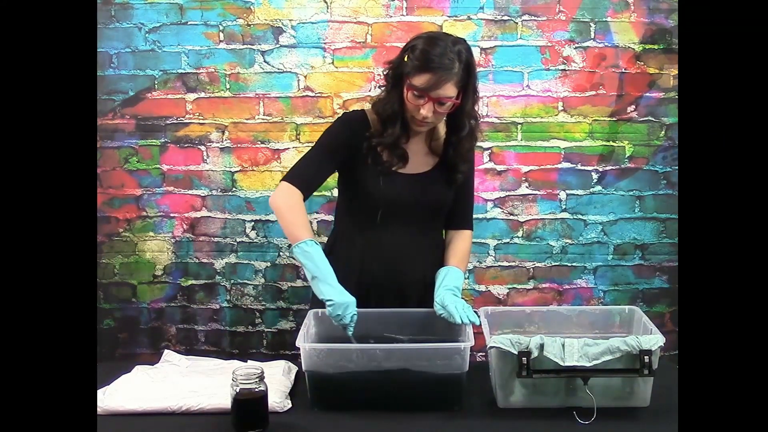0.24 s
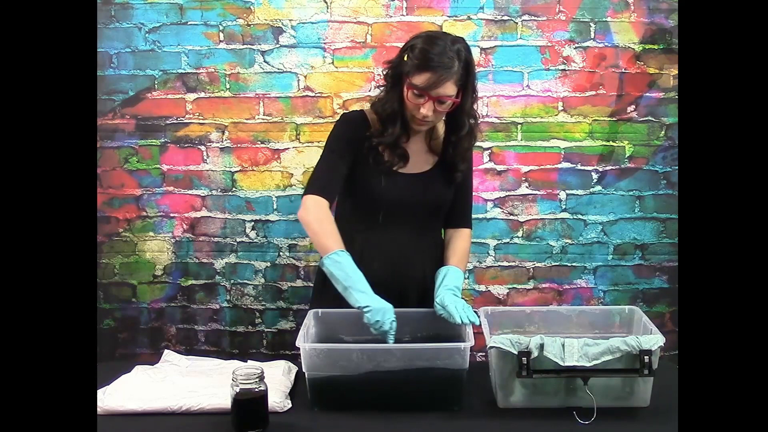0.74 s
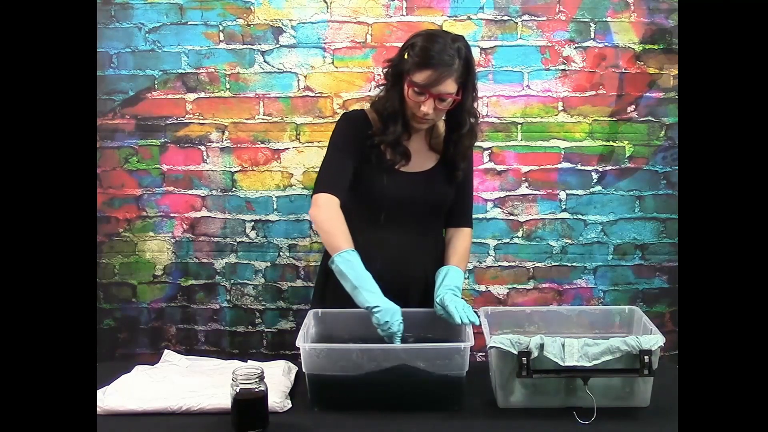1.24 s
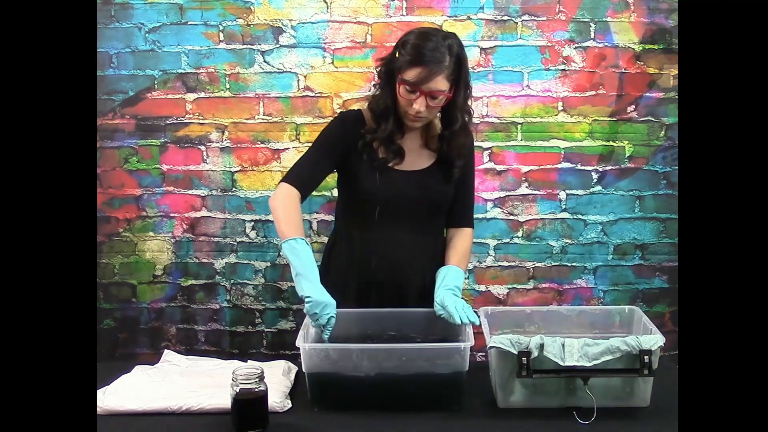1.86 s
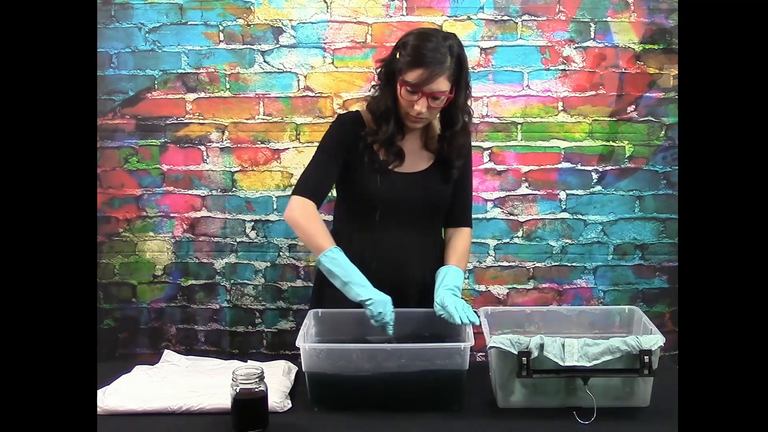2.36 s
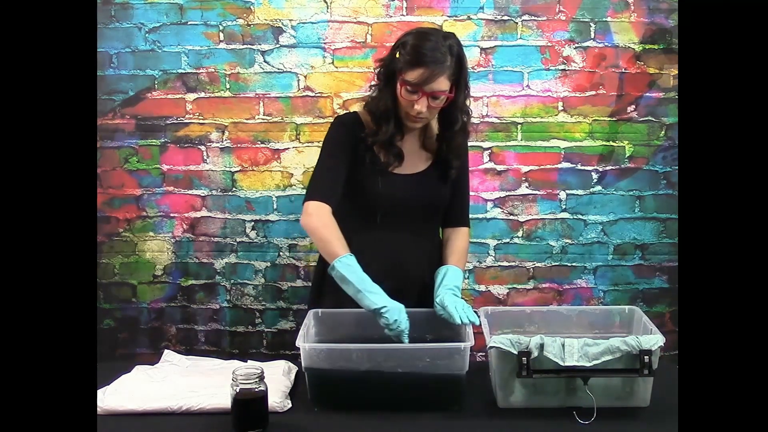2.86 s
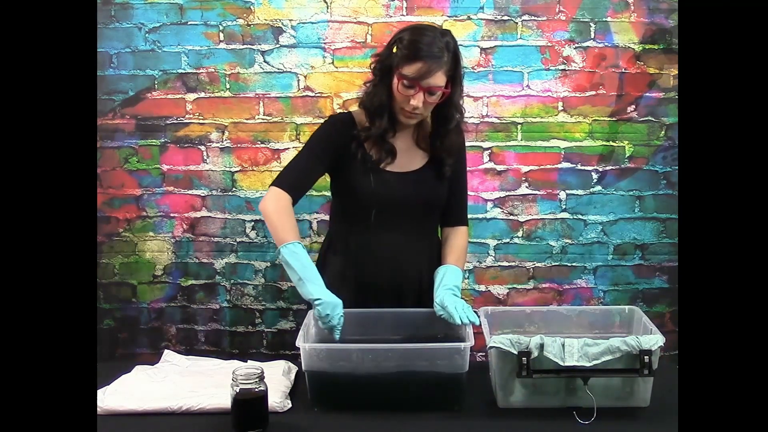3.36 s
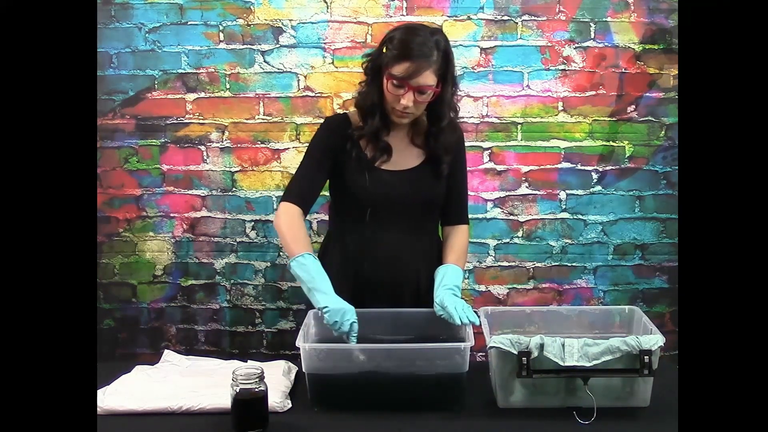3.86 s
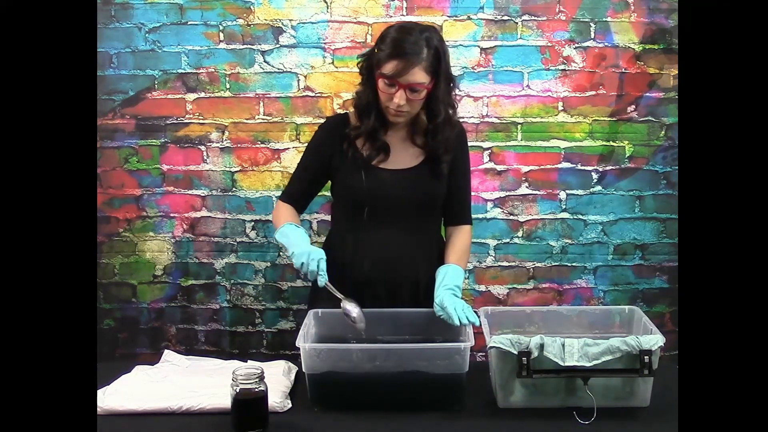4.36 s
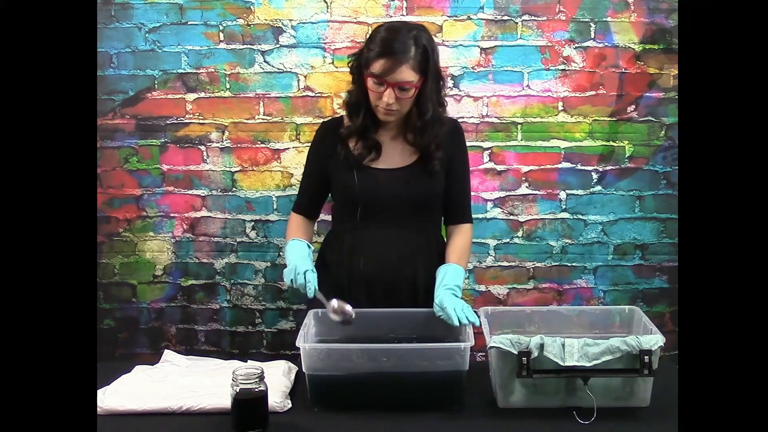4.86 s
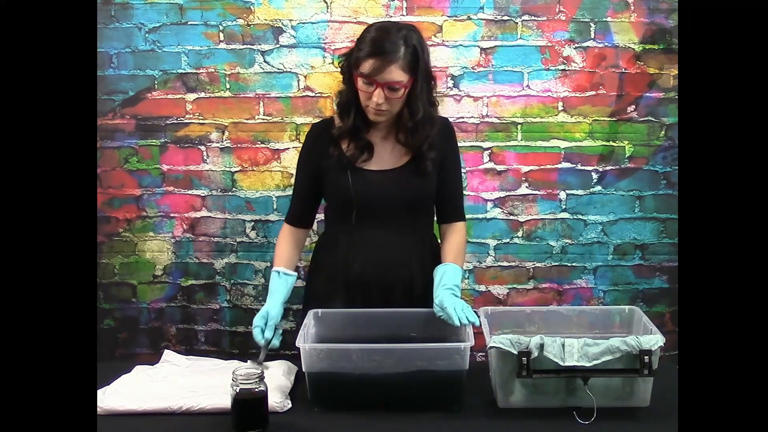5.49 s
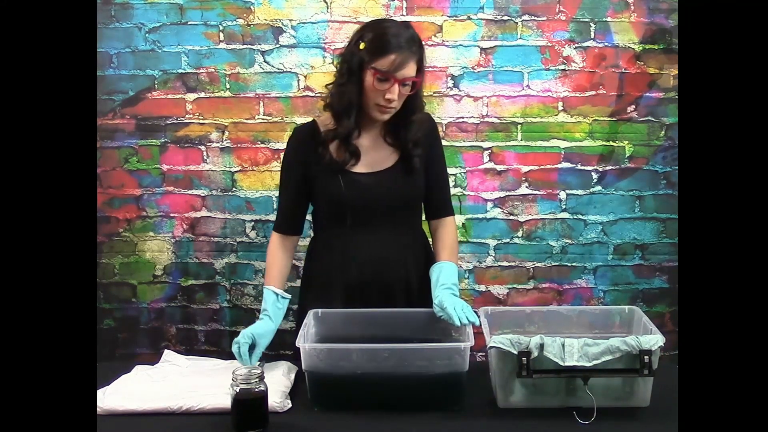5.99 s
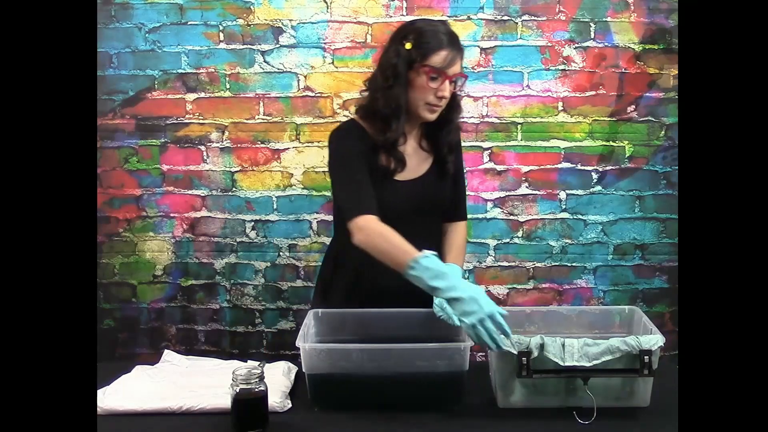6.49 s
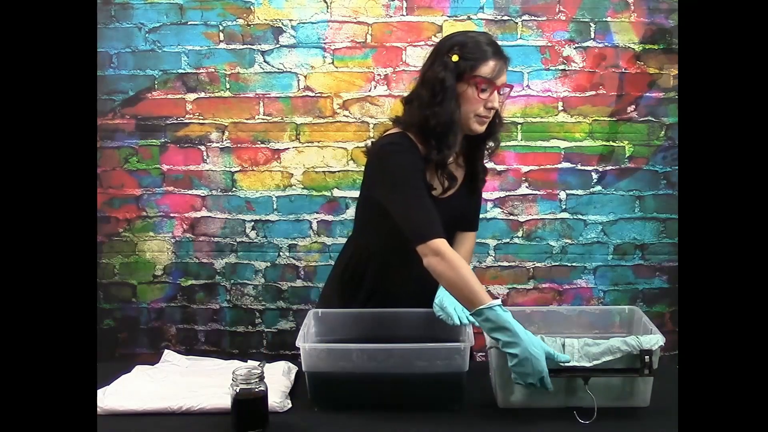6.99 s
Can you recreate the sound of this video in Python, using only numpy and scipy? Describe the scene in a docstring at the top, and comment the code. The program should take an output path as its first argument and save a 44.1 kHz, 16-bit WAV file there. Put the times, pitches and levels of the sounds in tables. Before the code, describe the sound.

Close up in a small, fairly dry room with soft hiss and faint hum, water gurgles and plinks as a spoon sweeps round a plastic tub for about four seconds. After a drip and a sharp click, the spoon knocks lightly in a glass jar. Rubbery, grainy glove and cloth movement follows, with a hollow bump on another tub and small closing clicks.

```python
"""Stirring a dye bath

A gloved hand stirs a plastic tub with a metal spoon: air bubbles ring as decaying tones, droplets snap as short
noise, an eddy gulps with a rising tone, and every stroke swishes and sprays. The spoon is lifted, drips, clicks and
is stood in a glass jar, a few short decaying tones. Sleeve and rubber gloves rustle as grainy noise, and a second
tub is bumped and booms. One close microphone hears it in a small, fairly dry room with steady hiss and faint hum."""
import sys
import numpy as np
from scipy import signal
from scipy.fft import rfft, irfft
from scipy.io import wavfile
from scipy.ndimage import uniform_filter1d

SR = 44100
rng = np.random.default_rng(int(sys.argv[2]) if len(sys.argv) > 2 else 0)


def to_wav(s):
    """Save 16-bit WAV."""
    ch = np.atleast_2d(s).T  # columns
    pcm = np.round(np.clip(ch, -1, 1) * 32767)  # PCM
    wavfile.write(sys.argv[1], SR, pcm.astype(np.int16))


N = 318843
T = np.arange(N) / SR  # time of every sample, in seconds
TOP_HZ = 15800  # highest pitch kept

# Steady background hiss, as a curve. Columns: frequency_hz, relative_level_db
AIR_COLOUR = [(12, -42), (20, -1), (77, -2), (120, -2.5), (168, -3), (262, -1.5), (897, -5), (1330, 2.5),
              (4180, -3), (5850, -2), (7730, -4.5), (8650, -1), (13200, -7), (16000, -12.5)]
# Hiss that differs between the two channels. Columns: frequency_hz, relative_level_db
SIDE_COLOUR = [(12, -27), (20, 0), (49, 1), (485, -5), (1120, -1.5), (4540, 0), (7730, -3.5), (9950, -6.5),
               (14300, -4.5), (16000, -2)]

# Sharp clicks of spoon and glove. Columns: start_s, level_db (before a trim), decay_s (to 1/e)
CLICKS = [(4.3666, -25, 0.00053), (4.802, -31.5, 0.00045), (5.117, -15.5, 0.0017), (5.123, -38.5, 0.027),
          (5.724, -25.5, .003), (5.873, -30.5, .0061), (5.881, -33, 0.017), (6.717, -20, 0.00078),
          (6.965, -34, .0017), (7.0583, -29, 0.00047), (7.072, -30, .0024), (7.166, -35.5, 0.0026)]
# Tone colour of those clicks. Columns: frequency_hz, relative_level_db
CLICK_COLOUR = [(180, -62), (300, -26), (749, -25), (1480, 0), (2210, -6), (3080, -4.5), (3700, -8.5),
                (3950, -6.5), (4750, -5), (7690, -8.5), (10200, -5), (12900, -13), (16000, -39)]
# Dull knocks of the spoon and the jar. Columns: start_s, level_db (before the bass is cut)
KNOCKS = [(5.327, -34), (5.8119, -13.5), (5.818, -40), (5.871, -24.5), (5.8893, -24.5), (5.915, -29)]
# Tones of the struck jar. Columns: pitch_hz, ring_s (time to fall 60 dB), relative_level_db
JAR = [(1115, 0.0079, 0.5), (1780, 0.0073, -1.5), (2230, 0.0092, -0.5), (2880, 0.0026, 4.5)]
# Bumps on the tubs. Columns: start_s, peak_db, contact_s
BUMPS = [(3.279, -44.5, 0.0032), (3.625, -43.5, 0.0029), (3.65, -49, .0027), (6.673, -26, .0004),
         (6.69, -30.5, 0.00068)]
# Tones of the struck tubs. Columns: pitch_hz, ring_s (time to fall 60 dB), relative_level_db
TUB = [(124.2, 0.3, -16), (223, 0.21, -17.5), (272.3, 0.34, -19.5), (323, 0.25, -13.5), (498, 0.074, -1.5),
       (557, 0.053, 2), (628, 0.11, 2), (698, 0.056, -0.5), (843, 0.067, -3)]

# A glove scuffs the tub's rim. Columns: start_s, level_db
SCUFFS = [(6.58, -50.5), (7.089, -46), (7.128, -44.5)]
# Tone colour of the scuffs. Columns: frequency_hz, relative_level_db
SCUFF_COLOUR = [(500, -27), (950, 2.5), (2100, -1), (4500, -21)]
# Movements of the arm, before the trims in rustle(). Columns: start_s, length_s, glove_hiss_db, sleeve_rustle_db
MOVES = [(4.05, 0.31, -54.5, -57.5), (4.41, 0.067, -52.5, -52.5), (4.61, 0.021, -60, -52.5),
         (4.79, 0.029, -56, -59.5), (5.21, 0.15, -61, -73), (5.46, 0.025, -57, -53),
         (5.56, 0.028, -49, -46.5), (5.68, 0.13, -49, -45.5), (5.79, 0.12, -46, -44),
         (5.96, .22, -52.5, -48.5), (6.16, 0.12, -47, -47), (6.27, 0.17, -45.5, -46),
         (6.47, .21, -48, -52.5), (6.7, 0.29, -50.5, -57), (7.04, 0.086, -49.5, -58),
         (7.17, 0.055, -47.5, -49.5)]
MOVE_ATTACK_S, MOVE_RELEASE_S = 0.029, 0.085  # rise time; time to die away to 1/e
# Tone colour of the rubber gloves. Columns: frequency_hz, relative_level_db
GLOVE_COLOUR = [(3000, -8), (5300, -34), (6500, 1.5), (8600, 6.5), (9800, 5.5), (11000, 1.5), (12600, 3.5),
                (14500, -5.5), (16000, -25)]
# Tone colour of the cloth sleeve. Columns: frequency_hz, relative_level_db
SLEEVE_COLOUR = [(150, -21), (500, -20.5), (750, -10.5), (1100, -0.5), (1400, 1), (2300, -2), (3100, 0.5),
                 (3800, -4), (5000, -4.5), (5900, -1), (7300, -10.5), (8600, -9.5), (10000, -15),
                 (16000, -30)]
# Tone colour of the fluttering air. Columns: frequency_hz, relative_level_db
DRAUGHT_COLOUR = [(25, 3), (200, -5.5), (600, -8.5), (3000, -70)]

# Strokes of the spoon, before the trims of each layer.
# Columns: start_s, length_s, small_bubbles_db, spray_db, swish_db
STROKES = [(0, 0.23, -44, -49, -55), (0.183, 0.097, -48, -38, -54), (0.423, 0.18, -68.5, -48.5, -61),
           (0.6, 0.25, -53, -47, -49), (0.977, 0.33, -58, -49.5, -71), (1.34, 0.18, -48.5, -48.5, -66),
           (1.555, 0.2, -49.5, -51, -74), (2.04, 0.15, -62, -54.5, -68), (2.2, .12, -39, -51, -56),
           (2.356, 0.13, -57, -51, -58.5), (2.66, 0.22, -69, -53.5, -62), (2.858, 0.31, -49.5, -47.5, -53),
           (3.208, 0.18, -41.5, -55, -54), (3.571, 0.17, -55, -52, -58)]
# The water is set moving in the first time and calms to 1/e in the other two
STROKE_ATTACK_S, WAKE_SETTLE_S, SPRAY_SETTLE_S = 0.038, 0.064, 0.061
STIR_END_S = 3.9  # the spoon leaves the water
# High tones the scraping spoon rings. Columns: pitch_hz, relative_level_db
SCRAPE_MODES = [(5900, -6), (7250, -9), (8500, -7), (9880, -0.5), (11650, -6), (13200, -7)]
# Tone colour of the swish. Columns: frequency_hz, relative_level_db
SWISH_COLOUR = [(80, -12.5), (300, -6), (650, -5.5), (1500, 0),
                (3200, 2.5), (4200, -9.5), (8500, -5.5), (15000, -24)]
# Tone colour of the fine spray. Columns: frequency_hz, relative_level_db
MIST_COLOUR = [(2000, -23), (5000, -15.0), (9000, 6.5), (12500, 6), (16000, -16)]

EDDY_OPENS_S, EDDY_GULPS_S, EDDY_CLOSES_S = 3.18, 3.258, 3.385  # air pocket forms, starts to gulp, is gone
# Pitch of the new pocket; level before and during the gulp, not counting the fade as the pocket shrinks
EDDY_HZ, EDDY_SOFT_DB, EDDY_GULP_DB = 474, -47.5, -32
# Louder droplets and bursting films. Columns: start_s, level_db (before a trim), centre_hz,
# width_ratio (width / centre, limited in snaps())
SNAPS = [(.0926, -21.5, 12200, 0.19), (0.0994, -22.5, 12000, 0.19), (.166, -21.5, 11800, 0.43),
         (0.197, -22.5, 5150, 0.89), (.2402, -25, 6600, 1.7), (.303, -23, 10500, 0.56),
         (.3971, -33.5, 12100, .43), (.6552, -25.5, 3740, 1), (0.811, -30.5, 7200, 0.75),
         (1.061, -33.5, 5000, 0.23), (1.2545, -31, 5140, 0.64), (1.489, -30, 7000, 0.1),
         (1.493, -19.5, 6740, 1.8), (1.5252, -20.5, 8500, 1.4), (1.601, -22, 6800, 1.6),
         (2.051, -22, 5560, 0.99), (2.224, -33, 4980, 0.092), (2.2712, -32, 8960, 0.12),
         (2.9022, -30.5, 5500, 0.13), (2.92, -20.5, 12400, 0.47), (2.9645, -29.5, 12500, .15),
         (3.0547, -30, 12500, 1.5), (3.2341, -31.5, 5070, 1.5), (3.7074, -31, 10000, 1.5),
         (3.7682, -29.5, 7560, 0.87), (4.502, -34, 4700, 1.8)]
# Larger air bubbles trapped by the spoon. Columns: start_s, pitch_hz, level_db, rise_octaves (over the ring time)
BUBBLES = [(.035, 417, -43, 0.1), (0.0307, 1125, -36, 0), (.0454, 2010, -32.5, 0.14),
           (0.069, 1910, -34, 0.13), (.109, 1520, -37, .1), (0.1413, 1540, -33, 0.015),
           (.1665, 2050, -20.5, 0.26), (.1977, 1760, -23, 0.18), (0.227, 1500, -29.5, .2),
           (0.2413, 2980, -22.5, 0.25), (0.2527, 1229, -17.5, 0), (.349, 2830, -28, .05),
           (.557, 2320, -31.5, 0), (0.6206, 1610, -30.5, 0.061), (0.6546, 3340, -15, 0),
           (.657, 2140, -22, .9), (1.0237, 3190, -30, 0.65), (1.159, 2156, -23.5, 0.035),
           (1.172, 3500, -28.5, 0.68), (1.33, 1730, -28.5, 0), (1.3319, 757, -32.5, 0),
           (1.3755, 1710, -31.5, 0.099), (1.412, 766, -34, 0.19), (1.4234, 1530, -28, 0.062),
           (1.446, 1850, -19.5, .15), (1.447, 846, -22.5, .4), (1.495, 2053, -17, 0),
           (1.5718, 3730, -25.5, .15), (1.574, 631, -40.5, 0.061), (1.6001, 1228, -19, 0),
           (1.63, 595, -46, .1), (1.737, 3120, -27.5, 0), (1.754, 3180, -27, 0.72),
           (1.837, 1904, -25.5, .25), (2.05, 1053, -17.5, .2), (2.055, 1644, -24, 0.62),
           (2.073, 600, -39.5, 0.86), (2.206, 1482, -18, 0.032), (2.216, 1594, -23.5, 0.58),
           (2.3728, 1360, -36.5, 0.45), (2.466, 1823, -35, .6), (2.574, 1950, -40.5, .2),
           (2.8695, 3480, -24, 0.34), (3.077, 424, -36, 0.13), (3.077, 1900, -30.5, 0),
           (3.132, 428, -28, 0.075), (3.1339, 1420, -22.5, 0.72), (3.138, 1480, -23.5, 1),
           (3.2335, 1624, -18, 0.025), (3.309, 2300, -26.5, 0.34), (3.3784, 1644, -29, 0.51),
           (3.679, 2200, -30.5, 0.34), (3.7187, 1194, -36.5, .3), (3.7417, 2246, -29.5, 0),
           (4.5013, 1774, -23.5, 0.096)]
# The ring time limit for low bubbles; well above the knee it shortens by this power of the pitch
RING_T60_S, RING_KNEE_HZ, RING_SLOPE = 0.12, 1000, 1.58
# Tone colour of the splash around each large bubble. Columns: frequency_hz, relative_level_db
SPLASH_COLOUR = [(400, -27.5), (900, -9.0), (2200, 6.5), (6000, -9.0), (15000, -7)]


def undb(db):
    """Turn decibels into gain."""
    return 10 ** (np.asarray(db) / 20)


def unit(x):
    """Scale a sound to an rms level of 1."""
    return x / np.sqrt(np.mean(x ** 2) + 1e-20)


def add(out, s, sound):
    """Mix a sound in at time s, in seconds."""
    i = int(np.clip(s * SR, 0, N - 1))
    out[i:i + len(sound)] += sound[:N - i]


def colour(x, points):
    """Shape the tone with a filter through (Hz, dB) points that never sounds ahead of its input."""
    size = 4096
    hz, db = np.transpose(points)
    bins_hz = np.arange(size // 2 + 1) * SR / size
    log_gain = np.log(undb(np.interp(np.log(bins_hz + 1), np.log(hz), db)))
    # folding the cepstrum (the spectrum of the log gain) to one side makes the filter causal
    cepstrum = irfft(log_gain)[:size // 2]
    cepstrum[1:] *= 2
    response = irfft(np.exp(rfft(cepstrum, size)))
    return signal.fftconvolve(x, response / np.linalg.norm(response))[:len(x)]


def walk(rate):
    """Smooth random wandering with a spread near 1, taking new values at this rate in Hz."""
    k = int(SR / rate)
    steps = np.repeat(rng.standard_normal(N // k + 1), k)
    return unit(uniform_filter1d(steps, k)[:N])


def burst(decay):
    """A crack of noise that starts near level 1 and dies away to 1/e in this many seconds."""
    t = T[:SR // 10]
    shape = np.exp(-t / decay)
    crack = rng.standard_normal(len(t)) * shape
    return crack * np.linalg.norm(shape) / np.linalg.norm(crack)


def crackle(rate, spread_db, hiss):
    """Tiny clicks of unequal size, on average this many a second, over a smooth hiss."""
    chance = rng.random(N)
    size = np.minimum(rng.exponential(size=N), 3.5)
    clicks = (chance < rate / SR) * undb(spread_db * size) * rng.choice([-1, 1], N)
    return unit(unit(clicks) + hiss * rng.standard_normal(N))


def gesture(start, length, attack, release):
    """Gain of one movement: it swells, holds until the movement ends, then dies away."""
    swell = np.clip((T - start) / attack, 0, 1)
    return swell * np.exp(-np.maximum(T - start - length, 0) / release)


def effort(table, axis, attack, release):
    """Gain of a series of movements, each at the dB of one column; where they overlap their powers add."""
    power = sum((undb(row[axis]) * gesture(row[0], row[1], attack, release)) ** 2 for row in table)
    return np.sqrt(power)


def air(level_db=-54.5, hum_hz=120, hum_db=-78):
    """Steady hiss with a faint wavering hum."""
    hum = np.sin(2 * np.pi * hum_hz * T) * (1 + 0.13 * walk(9.2))
    return colour(rng.standard_normal(N), AIR_COLOUR) * undb(level_db) + undb(hum_db) * hum


def room(x, echo_s=.007, echo_db=-11, early_db=-10, early_t60=0.092, tail_db=-10, tail_t60=0.4):
    """One near reflection, a scatter from tub and table, and a short tail."""
    t = T[:SR // 2]
    response = np.zeros(len(t))
    for db, t60, start in ((early_db, early_t60, .002), (tail_db, tail_t60, .009)):
        scatter = rng.standard_normal(len(t)) * np.exp(-np.log(1000) * t / t60) * (t > start)
        response += undb(db) * scatter / np.linalg.norm(scatter)
    response[int(echo_s * SR)] += undb(echo_db)
    return x + signal.fftconvolve(x, response)[:N]


def ring(modes, contact):
    """The tones of a struck body, peak 1; a longer contact leaves the high ones out."""
    t = T[:SR // 2]
    y = np.zeros(len(t))
    for k, (hz, t60, db) in enumerate(modes):
        gain = (-1) ** k * undb(db) / (1 + (hz * contact) ** 4)
        y += gain * np.sin(2 * np.pi * hz * t) * np.exp(-np.log(1000) * t / t60)
    return y / np.abs(y).max()


def handling(click_db=-2, knock_low_hz=650):
    """Sharp clicks of noise, knocks that ring the jar and hollow bumps that ring the tubs."""
    cracks, knocks, bumps = np.zeros((3, N))
    for s, db, decay in CLICKS:
        add(cracks, s, undb(db + click_db) * burst(decay))
    for s, db in KNOCKS:
        add(knocks, s, undb(db) * ring(JAR, 0))
    for s, db, contact in BUMPS:
        add(bumps, s, undb(db) * ring(TUB, contact))
    # cut the bass, so that the knocks sound light and dull
    knocks = signal.sosfilt(signal.butter(2, knock_low_hz, "high", fs=SR, output="sos"), knocks)
    return colour(cracks, CLICK_COLOUR) + knocks + bumps


def scuffs(length_s=0.046):
    """Rubber drags briefly on plastic: a soft swell of grainy noise."""
    swell = sum(undb(db) * np.sin(np.pi * np.clip((T - s) / length_s, 0, 1)) for s, db in SCUFFS)
    return swell * colour(crackle(rate=400, spread_db=5.5, hiss=0.39), SCUFF_COLOUR)


def rustle(top_db=-1.5, body_db=-1, draught_db=-21, crease_db=-20):
    """Rubber hisses and its creases tick, cloth rustles, and the air flutters faintly as the gloved hand moves."""
    hand = effort(MOVES, axis=2, attack=MOVE_ATTACK_S, release=MOVE_RELEASE_S)
    arm = effort(MOVES, axis=3, attack=MOVE_ATTACK_S, release=MOVE_RELEASE_S)
    gloves = colour(crackle(rate=1200, spread_db=4.5, hiss=0.85), GLOVE_COLOUR) * hand * undb(top_db)
    sleeve = colour(crackle(rate=1500, spread_db=7.5, hiss=1.02), SLEEVE_COLOUR) * arm * undb(body_db)
    flutter = colour(rng.standard_normal(N), DRAUGHT_COLOUR) * hand * undb(draught_db)
    ticks = signal.fftconvolve(crackle(rate=12, spread_db=3.5, hiss=0), burst(.0005))[:N]
    creases = colour(ticks * undb(crease_db), GLOVE_COLOUR) * hand
    return (gloves + creases + sleeve + flutter) * undb(1.7 * walk(45))  # all waver together


def scrape(width_hz=170, level_db=-58, release_s=0.15):
    """On each stroke the spoon drags along the tub's bottom; its high modes sing faintly and by turns."""
    drags = [gesture(row[0], row[1], STROKE_ATTACK_S, release_s) for row in STROKES]
    friction = rng.standard_normal(N) * undb(3 * walk(40) + 2 * walk(6))
    song = np.zeros(N)
    for hz, db in SCRAPE_MODES:
        waver = undb(3.5 * walk(9))
        b, a = signal.iirpeak(hz, hz / width_hz, fs=SR)
        song += undb(db) * waver * signal.lfilter(b, a, friction)
    return unit(song) * undb(level_db) * np.max(drags, axis=0)


def eddy(rough=0.49, wobble=0.0153, attack_s=0.011, release_s=0.0076, fade_s=0.016, shrink=0.33):
    """A hollow behind the spoon wobbles and shrinks evenly; pitch goes as one over its volume's cube root."""
    volume = np.clip((EDDY_CLOSES_S - T) / (EDDY_CLOSES_S - EDDY_OPENS_S), .02, 1)
    pitch_hz = EDDY_HZ / np.cbrt(volume) * (1 + wobble * walk(200))
    tone = np.sin(2 * np.pi * np.cumsum(pitch_hz) / SR)
    soft_s = EDDY_GULPS_S - EDDY_OPENS_S
    gulp_s = EDDY_CLOSES_S - fade_s - EDDY_GULPS_S
    soft = undb(EDDY_SOFT_DB) * gesture(EDDY_OPENS_S, soft_s, attack_s, release_s)
    gulp = undb(EDDY_GULP_DB) * gesture(EDDY_GULPS_S, gulp_s, attack_s, release_s)
    # a smaller pocket is quieter
    return tone * (soft + gulp) * volume ** shrink * (1 + rough * walk(170))


def snaps(decay=0.0013, level_db=-2):
    """Each droplet gives a millisecond or so of noise around its own pitch."""
    out = np.zeros(N)
    for s, db, hz, width in SNAPS:
        b, a = signal.iirpeak(min(hz, TOP_HZ), 1 / np.clip(width, .1, 1.3), fs=SR)
        drop = signal.lfilter(b, a, signal.lfilter(b, a, burst(decay)))
        drop = drop / np.linalg.norm(drop) * np.sqrt(SR * decay)  # same energy whatever the width
        add(out, s, undb(db + level_db) * drop)
    return out


def bubble(hz, t60, rise, onset=0.00053):
    """A pocket of air rings, fading by 60 dB in t60 s while its pitch glides by this many octaves."""
    t = T[:int(t60 * SR)]
    phase = 2 * np.pi * np.cumsum(hz * 2 ** (rise * t / t60)) / SR
    return np.sin(phase) * np.exp(-np.log(1000) * t / t60) * (1 - np.exp(-t / onset))


def swarm(count, low_hz, high_hz, cycles, scatter_db):
    """Small bubbles of unequal size between two pitches, spread over the time of stirring; rms 1."""
    out = np.zeros(N)
    for k, (when, length, size, rise) in enumerate(rng.random((count, 4))):
        hz = min(low_hz * (high_hz / low_hz) ** rng.triangular(0, .5, 1), TOP_HZ)
        t60 = cycles * (.5 + length) / hz
        start_s = STIR_END_S * (k + 2 * when) / count
        add(out, start_s, undb(scatter_db * size) * bubble(hz, t60, 0.65 * rise - .1))
    return out / np.std(out[T < STIR_END_S])


def lapping(wake, spray, level_db=-4.5, fizz_db=-7.5, plink_db=-7):
    """Small bubbles fill the wake, tiny ones chirp where wake and spray are strong, stray droplets plink."""
    small = swarm(count=2000, low_hz=717, high_hz=3430, cycles=31.5, scatter_db=26)
    fizz = swarm(count=700, low_hz=2530, high_hz=13300, cycles=25, scatter_db=31.0)
    plinks = swarm(count=100, low_hz=2300, high_hz=15000, cycles=55, scatter_db=22)
    bubbling = small * wake * undb(level_db) + fizz * np.sqrt(wake * spray) * undb(fizz_db)
    return bubbling + plinks * spray * undb(plink_db)


def wash(sweep, spray, level_db=-2, spray_db=-7.0):
    """Water parts around the spoon with a soft swish under a fine crackle of spray."""
    swish = colour(crackle(rate=1500, spread_db=3.5, hiss=0.98), SWISH_COLOUR)
    mist = colour(crackle(rate=1200, spread_db=5.5, hiss=.4), MIST_COLOUR)
    return swish * sweep * undb(level_db) + mist * spray * undb(spray_db)


def stirring():
    """Each stroke sweeps the water aside, throws a little spray and leaves a bubbling wake."""
    wake = effort(STROKES, axis=2, attack=STROKE_ATTACK_S, release=WAKE_SETTLE_S)
    spray = effort(STROKES, axis=3, attack=STROKE_ATTACK_S, release=SPRAY_SETTLE_S)
    sweep = effort(STROKES, axis=4, attack=STROKE_ATTACK_S, release=WAKE_SETTLE_S)
    return lapping(wake, spray) + wash(sweep, spray)


def bubbles(daughter_db=-14, lag_s=.011, spread_octaves=0.428, splash_db=-25):
    """Each large bubble rings amid a short splash, then sheds four weaker ones of neighbouring pitch."""
    out, splash = np.zeros((2, N))
    for s, hz, db, rise in BUBBLES:
        t60 = RING_T60_S / (1 + (hz / RING_KNEE_HZ) ** RING_SLOPE)
        add(out, s, undb(db) * bubble(hz, t60, rise))
        add(splash, s, undb(db + splash_db) * burst(0.021))
        for late, pitch in zip(rng.gamma(2, size=4), rng.standard_normal(size=4)):
            daughter_hz = min(hz * 2 ** (spread_octaves * (pitch + .5)), TOP_HZ)
            gain = undb(db + daughter_db - 2 * late)  # later ones are weaker
            add(out, s + lag_s * late, gain * bubble(daughter_hz, t60 / 2, 0.21))
    return out + colour(splash, SPLASH_COLOUR)


def scene(side_db=-67):
    """The same sound in both channels, plus a trace of hiss with opposite sign in each."""
    water = bubbles() + stirring() + snaps() + eddy()
    mid = room(water + scrape() + rustle() + scuffs() + handling()) + air()
    side = undb(side_db) * colour(rng.standard_normal(N), SIDE_COLOUR)
    return np.array([mid + side, mid - side])


def record(dry):
    """The recorder cuts the top with a steep filter."""
    return signal.sosfiltfilt(signal.ellip(8, .1, 60, TOP_HZ, fs=SR, output="sos"), dry)


dry = scene()
out = record(dry)
to_wav(out)
```